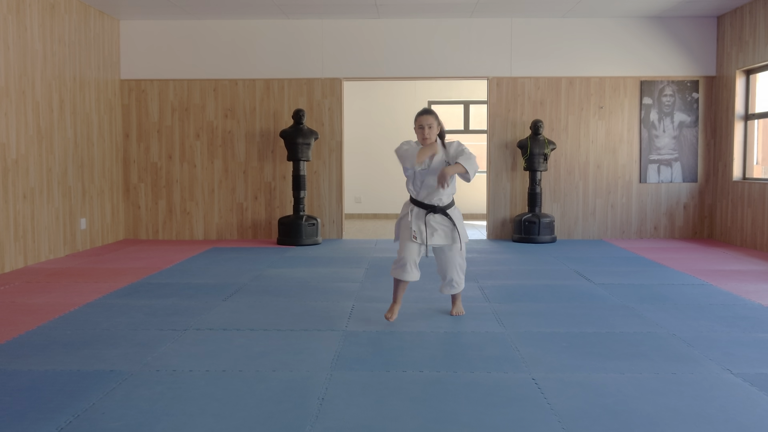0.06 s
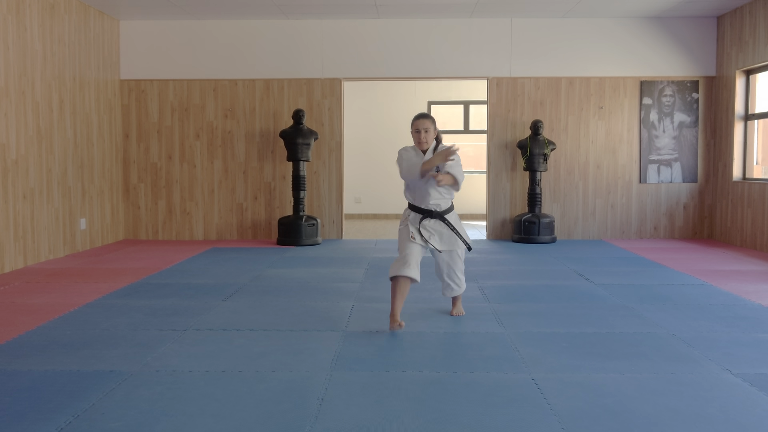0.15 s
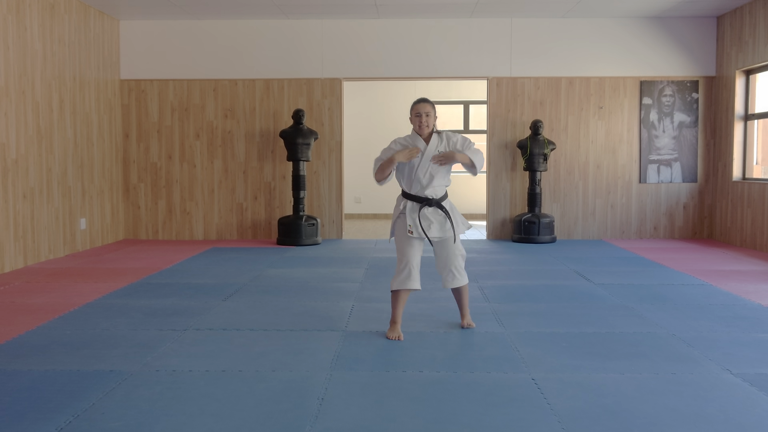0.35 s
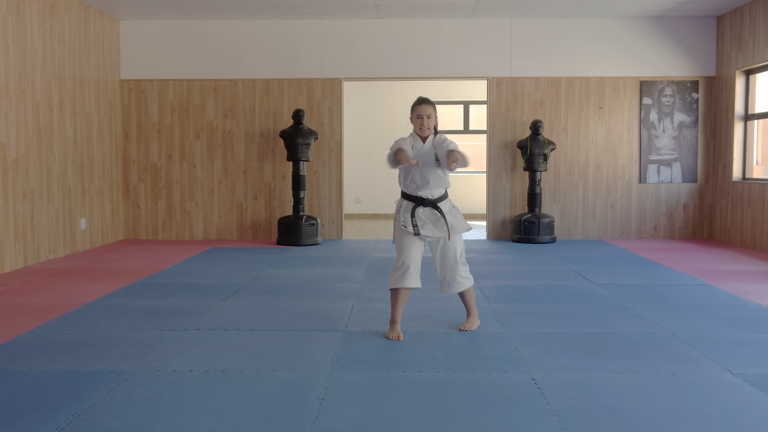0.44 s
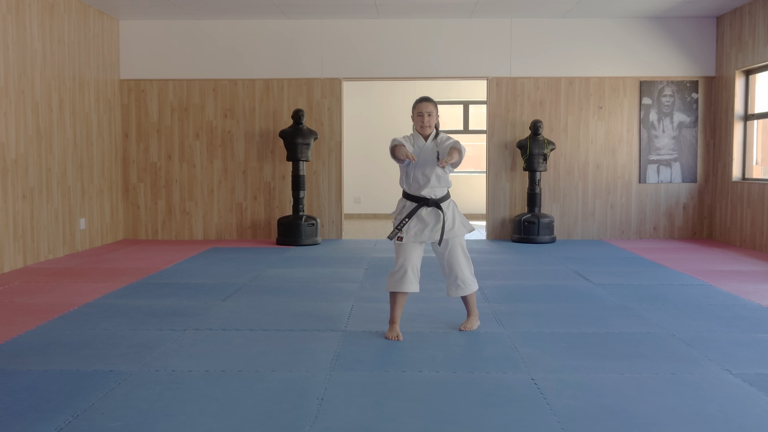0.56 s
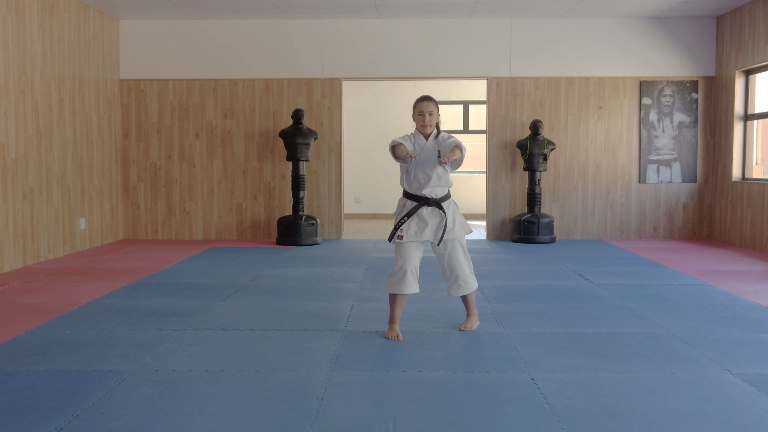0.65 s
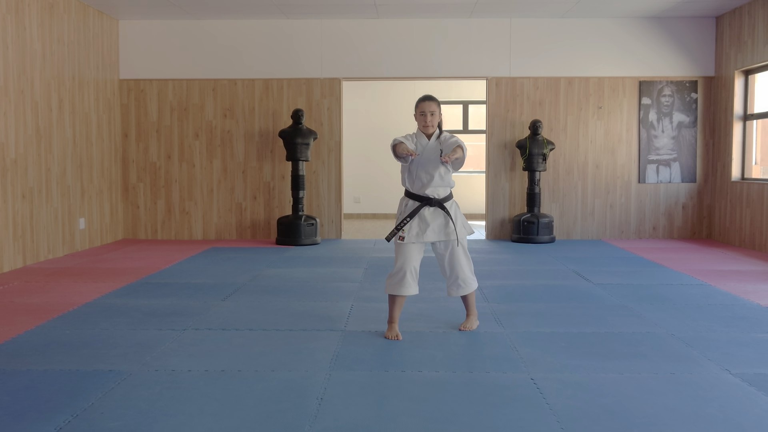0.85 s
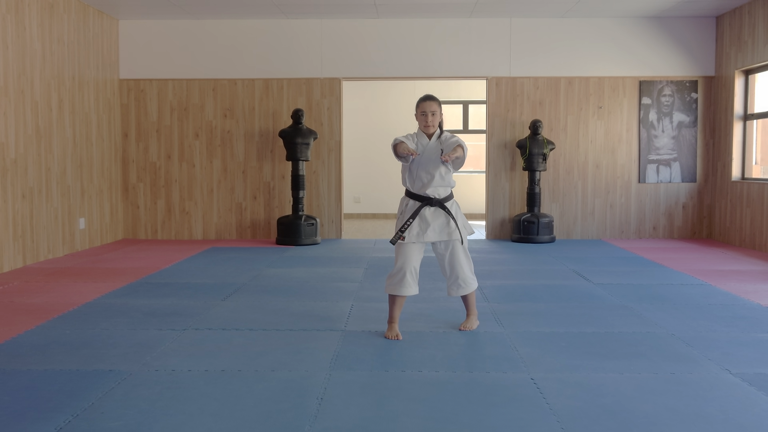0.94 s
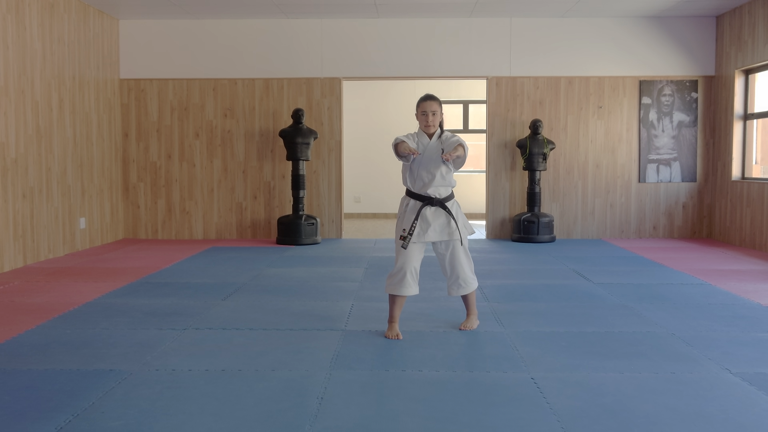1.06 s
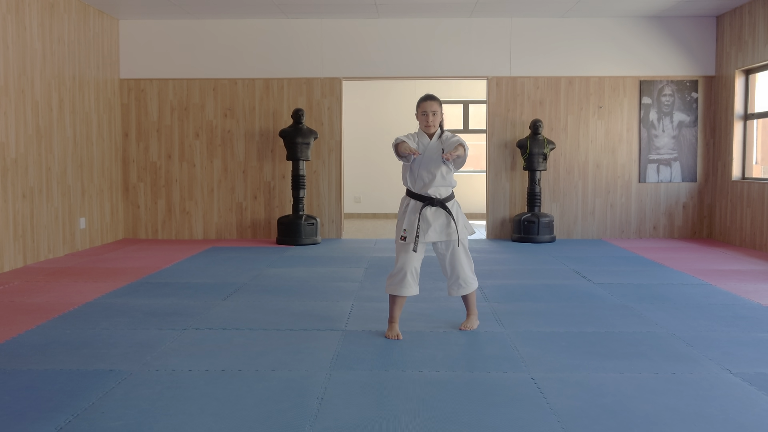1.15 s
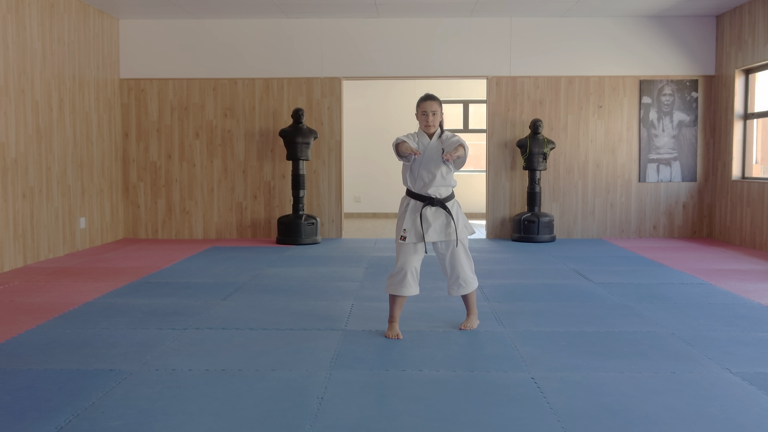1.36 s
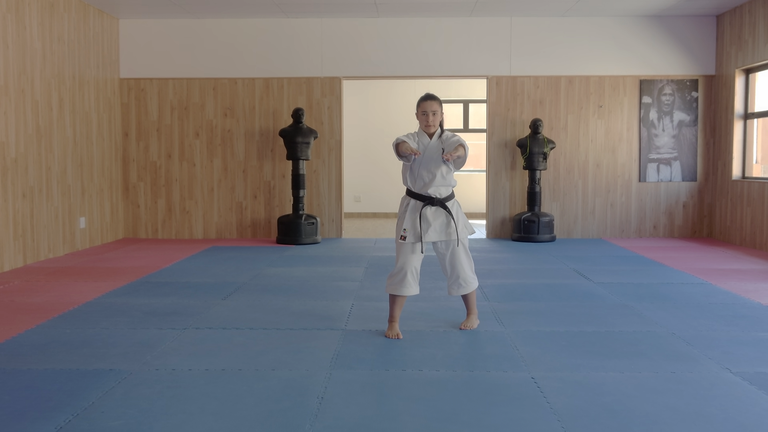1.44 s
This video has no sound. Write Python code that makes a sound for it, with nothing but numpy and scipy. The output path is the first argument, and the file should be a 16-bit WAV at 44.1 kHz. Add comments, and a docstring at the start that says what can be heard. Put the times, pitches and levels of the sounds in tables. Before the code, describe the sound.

Stiff cotton cloth cracks with one karate step and thrust, echoing in a training hall.

```python
"""A stiff cotton suit rustles and swings over a low rumble, some metres away in a wood-panelled hall.
A karateka is stepping forward and thrusting both arms out. A bare toe ticks on a foam mat, the foot skids
and thuds down, the cloth snaps taut, the sprung floor booms, and the sleeves hiss along the arms. The
cloth sounds are tiny clicks of creases mixed with the hiss of fibres. The suit crinkles faintly in the
held stance while the hall rings on for over a second."""
import sys
import numpy as np
from scipy import signal
from scipy.fft import rfft, irfft
from scipy.io import wavfile

SR = 44100
rng = np.random.default_rng(int(sys.argv[2]) if len(sys.argv) > 2 else 0)


def output_pcm(signal):
    """Save a mono or channel-first signal as 16-bit PCM at the path in sys.argv[1].

    Samples are clipped to [-1, 1] before scaling.
    """
    pcm = np.clip(np.atleast_2d(signal).T, -1, 1) * 32767
    wavfile.write(sys.argv[1], SR, np.round(pcm).astype(np.int16))


N = 66150

# A colour says how strong each frequency is next to the others; a tilt adds treble or takes it away.
# colour of the room's rumble: f/Hz, level/dB
RUMBLE_COLOUR = [(20, -27.5), (35, -15), (52, 2), (80, -5), (130, -3), (190, -1.5), (250, -15),
                 (360, -28.5), (450, -25.5), (650, -27), (1300, -31), (2300, -38.5), (5000, -35),
                 (7000, -55.5), (9800, -54), (11700, -41), (14000, -45.5), (16000, -39)]
# the suit rubbing on itself: t/s, level/dB
RUSTLE_LEVELS = [(0, -56), (.06, -50), (.14, -45), (.22, -43), (.26, -39.5), (.33, -28), (.42, -49.5),
                 (.48, -38.5), (.56, -41), (.68, -43), (.85, -81)]
# colour of that rubbing: f/Hz, level/dB
RUSTLE_COLOUR = [(100, 8), (500, 1.5), (1000, -1), (1600, -1), (2600, -5.5), (4500, -2.5), (6500, -11),
                 (8000, -28), (11000, -16.5), (16000, -13)]
# loose cloth swung through the air: peak t/s, level/dB, rise/s, fall/s, centre f/Hz
SWINGS = [(.08, -52, 0.018, 0.023, 586), (0.193, -36.5, 0.026, 0.02, 638), (.215, -41, 0.048, 0.064, 233),
          (0.32, -26, 0.0038, 0.017, 333), (.321, -27.5, 0.01, 0.0075, 720),
          (0.358, -26.5, 0.0075, 0.0044, 975), (0.374, -36.5, 0.0058, 0.052, 1990),
          (0.46, -36, 0.012, 0.01, 673), (.575, -37, 0.044, 0.012, 649)]
# the toe touching the mat, then cloth snapping taut: t/s, level/dB, decay/s, tilt/(dB per octave)
TICKS_AND_CRACKS = [(0.227, -20.5, .003, 5), (.243, -32.5, 0.015, -0.5), (0.287, -33.5, 0.014, 8),
                    (.297, -15.5, 0.0086, 4.5), (0.312, -18, 0.016, 2), (0.322, -23, 0.0042, 6),
                    (0.333, -23, .012, 1.5), (0.353, -17, 0.011, 0), (0.365, -23.5, 0.011, -0.5),
                    (0.4, -32, 0.031, -1)]
# colour of those ticks and cracks: f/Hz, level/dB
TICK_AND_CRACK_COLOUR = [(60, -1.5), (200, -3), (320, -8), (550, 4.5), (850, 0.5), (1200, -2), (1700, -3),
                         (2600, -10), (4200, -8), (6300, -17), (8000, -32.5), (11000, -27), (16000, -19)]
# colour of the skidding sole: f/Hz, level/dB
SCUFF_COLOUR = [(600, -35), (1150, -19.5), (1380, 3), (1600, -2), (1800, -6), (2000, -19.5), (4000, -35)]
# the foot landing and the weight settling: t/s, level/dB, decay/s
THUDS = [(.291, -17, 0.014), (0.314, -23, 0.013), (0.343, -25, 0.011), (0.526, -29.5, 0.01),
         (0.562, -31.5, 0.04), (0.686, -31, .012), (1.058, -42.5, 0.02)]
# colour of the thuds on the mat: f/Hz, level/dB
THUD_COLOUR = [(25, -51), (38, 0), (52, 5.5), (80, 7), (140, 8.5), (220, 2.5), (320, -0.5), (450, -21),
               (900, -3), (4000, -67.5)]
# sleeves sliding along the arms: peak t/s, level/dB, rise/s, fall/s, tilt/(dB per octave)
SLIDES = [(.485, -37, 0.031, 0.12, 4.5), (0.552, -17, .008, 0.009, 7), (.576, -29, 0.015, 0.017, 1),
          (0.604, -33.5, 0.03, 0.022, -7)]
# colour of the sleeves' hiss: f/Hz, level/dB
SLIDE_COLOUR = [(700, -14), (1500, -11), (2800, 5), (3400, -0.5), (4200, 8), (6200, -1), (7600, -14),
                (10300, -12), (13000, -6.5), (16000, -5)]
# the suit settling in the held stance: peak t/s, level/dB, rise/s, fall/s
CRINKLES = [(1.049, -71.5, 0.063, 0.036), (1.369, -76, 0.0091, 0.061), (1.48, -71.5, 0.031, 0.046)]
# colour of the crinkling: f/Hz, level/dB
CRINKLE_COLOUR = [(1000, -23), (4500, 7.5), (7000, -19), (9500, -13), (11500, 9.5), (16000, 4)]
# how long the hall rings (t60 is the time to fade by 60 dB): f/Hz, t60/s
HALL_RING_TIMES = [(50, 2.05), (180, 2.07), (380, 0.8), (650, 1.66), (1400, 0.98), (2100, 2), (2800, 1.59),
                   (3500, 1.02), (5000, 1.23), (8000, 0.76), (11000, 0.72), (15000, 0.33)]
# the hall at the listener: f/Hz, level/dB, left minus right/dB, likeness of the two sides (-1 to 1)
HALL_TONE = [(51.3, -0.5, 5.5, 0.93), (130, -5.5, -2.3, 0.98), (266, -4.5, -1.5, 0.91),
             (386, -2.5, -3.5, 1), (670, -1, -3.5, 0.7), (1404, -3, -6.5, -.35), (2130, 1, -8.5, 0.01),
             (4750, -7, -8, 0), (7380, -7, -16.5, 0.2), (9800, 2.5, 0.5, 0), (14740, -12.5, 1.5, 0.05)]
# standing waves, the hall's own notes: f/Hz, level/dB, t60/s
HALL_NOTES = [(54.77, -31.5, 1.4), (138, -38.5, 1.1), (191.6, -26.5, 1.21), (298.3, -37.5, 1.3),
              (591.4, -30.5, 1), (2845, -25.5, 1.2)]


def undb(db):
    """Turn decibels into a factor to multiply by."""
    return 10 ** (np.asarray(db) / 20)


def look_up(table, hz, column=1):
    """Read between the rows of a table, with frequency counted in octaves."""
    rows = np.array(table, float)
    return np.interp(np.log(np.maximum(hz, 1)), np.log(rows[:, 0]), rows[:, column])


def colour(sound, table, tilt_db=0):
    """Give a sound a colour, tilted above 500 Hz; plain noise keeps its power."""
    hz = np.maximum(np.arange(N + 1) * SR / (2 * N), 1)
    gain = undb(look_up(table, hz) + tilt_db * np.log2(np.maximum(hz, 500)))
    gain /= np.sqrt(np.mean(gain ** 2))
    cepstrum = irfft(np.log(gain))
    cepstrum[1:N] *= 2  # folded forward in time, so the filter never rings ahead of the sound
    cepstrum[N + 1:] = 0
    return irfft(rfft(sound, 2 * N) * np.exp(rfft(cepstrum)))[:N]


def stereo_noise(likeness):
    """Spectra of left and right noise; a likeness near 1 makes them almost the same."""
    mid, side = rfft(rng.standard_normal((2, N)))
    likeness = np.clip(likeness, -.99, .995)
    return np.sqrt((1 + likeness) / 2) * mid + np.sqrt((1 - likeness) / 2) * side * [[1], [-1]]


def hit(t, start, decay, attack_s=.001):
    """A level that jumps up and dies away."""
    age = np.maximum(t - start, 0)
    return (1 - np.exp(-age / attack_s)) * np.exp(-age / decay)


def swell(t, peak, rise, fall):
    """A bell-shaped curve: a limb speeds up, then slows down."""
    return np.exp(-.5 * ((t - peak) / np.where(t < peak, rise, fall)) ** 2)


def grain(clicks_per_s=2500, spread_db=5, hiss_share=.76):
    """Random clicks over an even hiss; in cloth, these are buckling creases and rubbing fibres."""
    sizes = undb(spread_db * np.minimum(rng.exponential(size=N), 4))
    clicks = (rng.random(N) < clicks_per_s / SR) * sizes * rng.choice([-1, 1], N)
    hiss = rng.standard_normal(N)
    return np.sqrt(1 - hiss_share) * clicks / clicks.std() + np.sqrt(hiss_share) * hiss


def rumble(level_db=-57.5, alike_below_hz=650):
    """The room rumbles steadily, its bass nearly the same in both ears."""
    hz = np.fft.rfftfreq(N, 1 / SR)
    air = irfft(stereo_noise(.95 / (1 + (hz / alike_below_hz) ** 2)), N)
    return undb(level_db) * np.array([colour(side, RUMBLE_COLOUR) for side in air])


def rustle(t):
    """The suit rubs on itself while the body moves."""
    times, levels_db = np.array(RUSTLE_LEVELS).T
    return colour(undb(np.interp(t, times, levels_db)) * grain(), RUSTLE_COLOUR)


def swings(t, half_width_octaves=.22, edge_db_per_octave=25):
    """Wide trouser legs and sleeves whoosh through the air, each swing around its own pitch."""
    octaves = np.array([-4, -half_width_octaves, half_width_octaves, 4])
    hump_db = -edge_db_per_octave * (np.abs(octaves) - half_width_octaves)
    return [colour(undb(db) * swell(t, peak, rise, fall) * grain(), np.c_[hz * 2 ** octaves, hump_db])
            for peak, db, rise, fall, hz in SWINGS]


def ticks_and_cracks(t):
    """Sharp ticks and cracks: the toe touches the mat, then the cloth snaps taut."""
    return [colour(undb(db) * hit(t, start, decay) * grain(), TICK_AND_CRACK_COLOUR, tilt)
            for start, db, decay, tilt in TICKS_AND_CRACKS]


def scuff(t, level_db=-34):
    """Just before landing, the bare sole catches and slips on the foam with a narrow rasp."""
    skid = undb(level_db) * swell(t, peak=.24, rise=.0031, fall=.041)
    return colour(skid * grain(), SCUFF_COLOUR)


def foot(t):
    """The ball of the foot, the heel and the body's weight thud into the mat."""
    push = sum(undb(db) * hit(t, start, decay) for start, db, decay in THUDS)
    return colour(push * rng.standard_normal(N), THUD_COLOUR)


def floor(t, peak_s=.367, hz=56.6, level_db=-38):
    """The sprung floor gives under the body's full weight and booms for a few deep cycles."""
    bounce = np.sin(2 * np.pi * hz * (t - peak_s))
    return undb(level_db) * swell(t, peak_s, rise=.025, fall=.0097) * bounce


def sleeves(t):
    """The sleeves slide with a bright hiss as the arms shoot forward."""
    return [colour(undb(db) * swell(t, peak, rise, fall) * grain(), SLIDE_COLOUR, tilt)
            for peak, db, rise, fall, tilt in SLIDES]


def crinkles(t, right_db=-24.5):
    """The cloth settles with a thin, faint crackle on the left."""
    motion = sum(undb(db) * swell(t, peak, rise, fall) for peak, db, rise, fall in CRINKLES)
    return colour(motion * grain(), CRINKLE_COLOUR) * undb([[0], [right_db]])


def fade(t, t60):
    """A fall of 60 dB every t60 seconds, with the same total energy whatever its length."""
    return undb(-60 * t / t60) * np.sqrt(2 * np.log(1000) / (t60 * SR))


def hall(sounds, t, direct_db=-12, early_db=-7.5, tail_db=-4, build_s=.0022):
    """Each sound arrives directly, then as early echoes, standing waves and a long fading tail."""
    hz = np.fft.rfftfreq(N, 1 / SR)
    noise = stereo_noise(look_up(HALL_TONE, hz, column=3))
    centres_hz = 31.25 * 2 ** (np.arange(28) / 3)  # three bands to the octave, each fading on its own
    masks = [np.interp(np.log(hz + 1), np.log(centres_hz), row) for row in np.eye(len(centres_hz))]
    bands = np.array([np.tile(irfft(noise * mask, N), 2) for mask in masks], "f")
    early = undb(early_db) * fade(t, t60=.12)
    tails = [undb(tail_db) * fade(t, t60) for t60 in look_up(HALL_RING_TIMES, centres_hz)]
    build_up = 1 - np.exp(-t / build_s)
    decays = np.array(build_up * np.hypot(tails, early), "f")
    notes = sum(undb(db) * fade(t, t60) * np.sin(2 * np.pi * f * t) for f, db, t60 in HALL_NOTES)
    heard = 0
    # the body moves, so every sound meets its own pattern of echoes
    for sound, offset in zip(sounds, rng.integers(0, N, len(sounds))):
        echoes = np.einsum("bcn,bn->cn", bands[:, :, offset:offset + N], decays)  # add up the bands
        response = echoes + notes
        response[:, 0] += undb(direct_db)
        heard = heard + rfft(sound, 2 * N) * rfft(response, 2 * N)
    hz = np.fft.rfftfreq(2 * N, 1 / SR)
    balance_db = look_up(HALL_TONE, hz, column=2) * [[.5], [-.5]]
    return irfft(heard * undb(look_up(HALL_TONE, hz) + balance_db))[:, :N]


def scene():
    """Suit and foot echo in the hall; the boom, crinkles and rumble are added without echoes."""
    t = np.arange(N) / SR
    sounds = [foot(t), scuff(t), rustle(t), *ticks_and_cracks(t), *swings(t), *sleeves(t)]
    return hall(sounds, t) + floor(t) + crinkles(t) + rumble()


def record(dry, low_cut_hz=38, high_cut_hz=15750):
    """Cut away the deepest bass and the highest treble."""
    low_cut = signal.butter(6, low_cut_hz, "high", fs=SR, output="sos")
    high_cut = signal.ellip(14, .2, 80, high_cut_hz, fs=SR, output="sos")
    return signal.sosfilt(high_cut, signal.sosfilt(low_cut, dry))


dry = scene()
out = record(dry)
output_pcm(out)
```